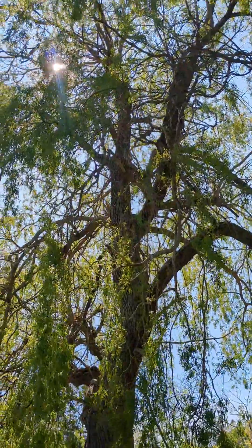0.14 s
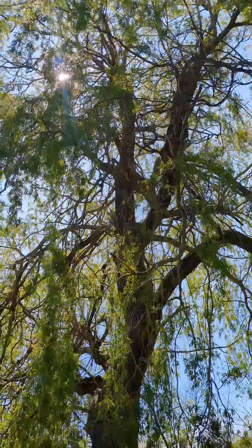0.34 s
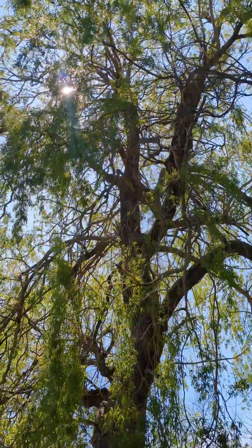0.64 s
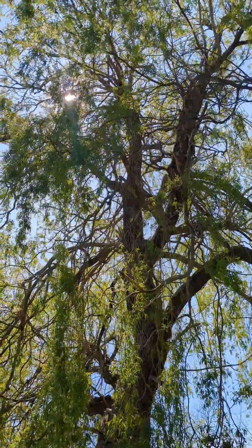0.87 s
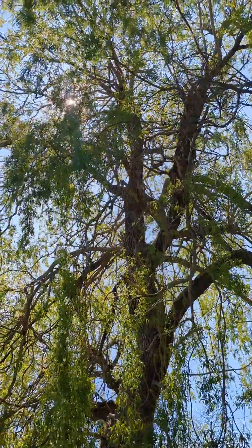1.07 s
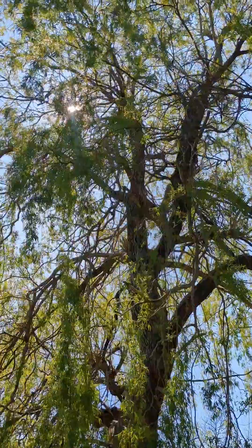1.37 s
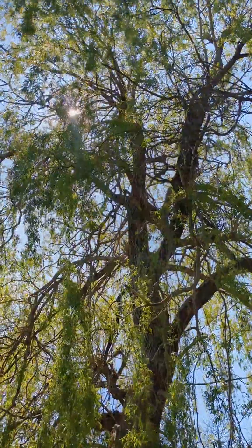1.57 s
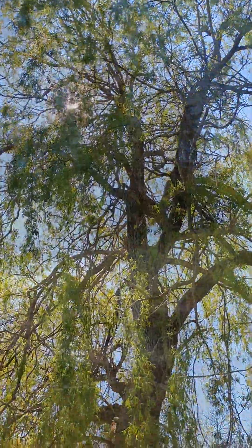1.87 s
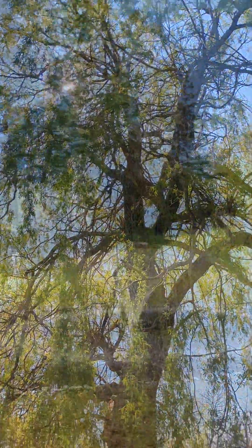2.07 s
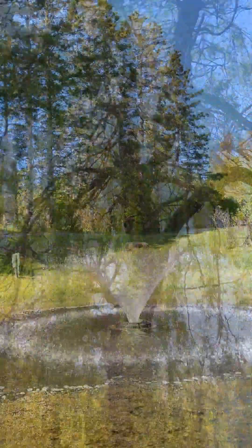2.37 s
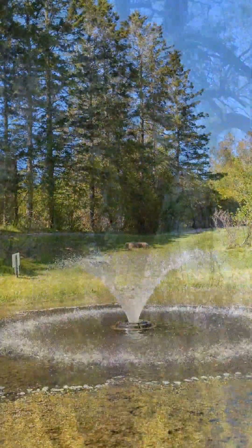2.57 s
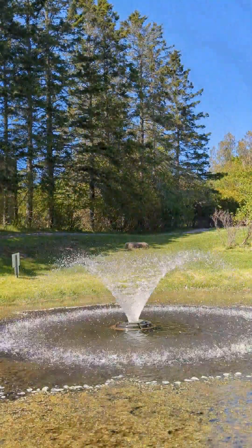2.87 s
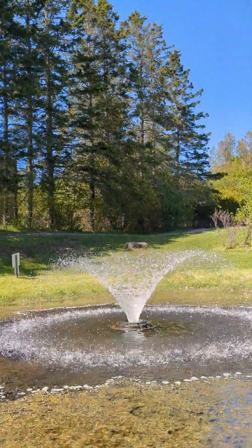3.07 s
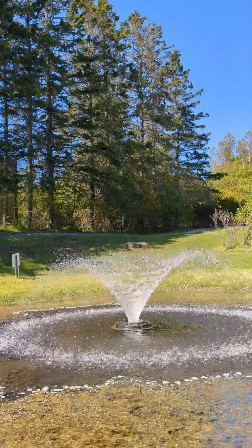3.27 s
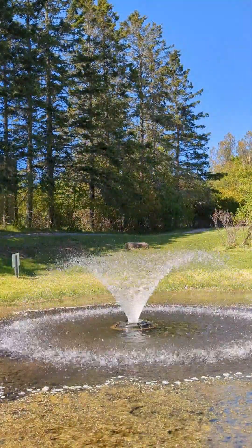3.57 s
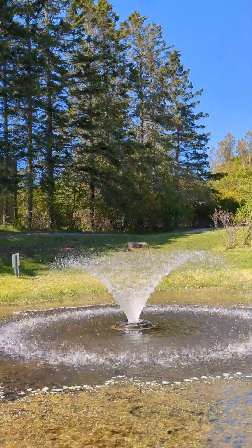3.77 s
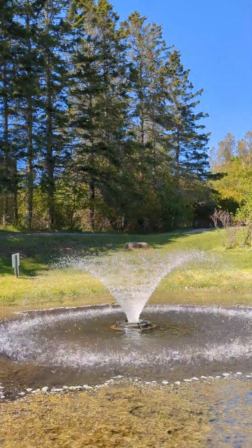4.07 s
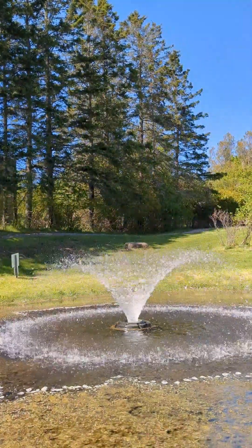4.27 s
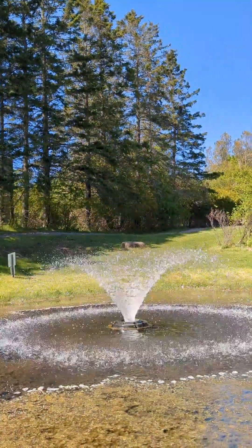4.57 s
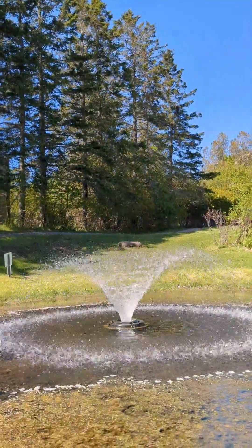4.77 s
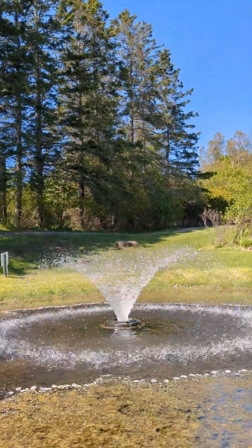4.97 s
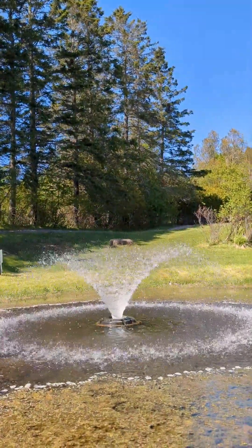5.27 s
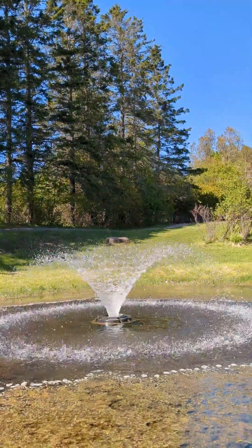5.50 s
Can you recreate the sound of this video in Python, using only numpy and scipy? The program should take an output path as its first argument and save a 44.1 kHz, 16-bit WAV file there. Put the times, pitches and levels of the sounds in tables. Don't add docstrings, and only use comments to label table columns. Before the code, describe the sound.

Soft dry-grass scuffs and faint breeze under a tree, then a quick change to a steadily splashing pond fountain, ending with a gust thump.

```python
import sys
import numpy as np
from scipy import signal
from scipy.fft import rfft, irfft, next_fast_len
from scipy.io import wavfile
from scipy.ndimage import uniform_filter1d

SR = 44100
rng = np.random.default_rng(int(sys.argv[2]) if len(sys.argv) > 2 else 0)


def to_wav(sig):
    pcm = np.clip(np.atleast_2d(sig), -1, 1) * 32767
    pcm = np.round(pcm).astype(np.int16)
    wavfile.write(sys.argv[1], SR, pcm.T)


def boost_factor(decibels):
    exponent = np.asarray(decibels, float) / 20
    return 10 ** exponent


N = 248724
T = np.arange(N) / SR
CUT_S = 1.524
SURGE_DB, SURGE_PER_S = 0.76, 9.0
HOP = 16


def evened(x):
    return x / np.sqrt(np.mean(x ** 2) + 1e-20)


def read(points, hz):
    f, value = np.transpose(points)
    return np.interp(np.log(hz + 1), np.log(f + 1), value)


def curves(rows):
    s, *columns = np.transpose(rows)
    return [np.interp(T, s, c) for c in columns]


def colour(x, gain):
    size = next_fast_len(N + 4096)
    hz = np.fft.rfftfreq(size, 1 / SR)
    return irfft(rfft(x, size) * gain(hz), size)[..., :N]


def below(corner_hz, order):
    return lambda hz: 1 / (1 + (hz / corner_hz) ** order)


def above(corner_hz, order):
    return lambda hz: 1 / (1 + (corner_hz / (hz + 1)) ** order)


def panned(x, pan_db):
    return np.array([x * boost_factor(pan_db / 2), x * boost_factor(-pan_db / 2)])


def wander(per_s):
    t = T[::64]
    paces = per_s * np.geomspace(0.1, 1, num=12)
    drift = sum(np.sin(2 * np.pi * (f * t + rng.random())) for f in paces)
    return np.interp(T, t, evened(drift))


def strokes(rows, attack, release_db):
    (s, hold, db, extra), t = np.transpose(rows)[:, :, None], T[::HOP]
    fall_db = release_db * np.maximum(t - s - attack - hold, 0)
    return np.clip((t - s) / attack, 0, 1) * boost_factor(db - fall_db), extra


def together(parts, rest):
    level = np.sqrt((parts ** 2).sum(-2) + rest ** 2)
    return uniform_filter1d(np.repeat(level, HOP, axis=-1), size=HOP, axis=-1)[..., :N]


def hiss(same, patchy_db, flicker_db):
    frames, hz = N // 64 + 9, np.fft.rfftfreq(256, 1 / SR)
    a, b, c, d, patches = rng.standard_normal((frames, 129, 5)).T
    patches = uniform_filter1d(patches, size=5, axis=0)
    patches = evened(uniform_filter1d(patches, size=30, axis=1))
    flicker = evened(uniform_filter1d(rng.standard_normal(frames), size=6))
    like = np.clip(read(same, hz), 0, 1)[:, None]
    right = a + 1j * b
    left = like * right + np.sqrt(1 - like ** 2) * (c + 1j * d)
    z = np.array([left, right]) * boost_factor(patchy_db * patches + flicker_db * flicker)
    return evened(signal.istft(z, nperseg=256, noverlap=192)[1][:, :N])


def bubble(hz, cycles, glide, lag=0.):
    t = np.arange(int(SR * (3 * cycles / hz + .001))) / SR
    u = np.maximum(t - lag, 0) * hz / cycles
    envelope = 1.43 * (1 - np.exp(-6.5 * u)) * np.exp(-2.8 * u)
    return envelope * np.sin(2 * np.pi * cycles * (u + glide * u ** 2 / 2))


def patter(per_s, spread_db, lo_hz, hi_hz, cycles, level, count=36):
    size_db = spread_db * np.minimum(rng.exponential(1, N), 3.8)
    size = boost_factor(size_db) * (rng.random(N) < per_s / SR)
    kind, chance = rng.integers(0, count, N), rng.random((count, 3))
    out = np.zeros((2, N))
    for k, hz in enumerate(np.geomspace(lo_hz, hi_hz, count)):
        ring, glide, bearing = cycles * (.5 + chance[k, 0]), 0.46 * chance[k, 1], 5e-5 * chance[k, 2]
        pair = np.array([bubble(hz, ring, glide, bearing), bubble(hz, ring, glide, 2.5e-5)])
        pair *= boost_factor(read(level, hz)) * np.sqrt(hz) / np.linalg.norm(pair[1])
        out += signal.oaconvolve(size[None] * (kind == k), pair, axes=1)[:, :N]
    return evened(out)


def knocks(rows, turns, glide, trim_db, lag, longer=0):
    out = np.zeros((2, N + SR))
    for s, peak_db, hz, pan_db in rows:
        cycles = turns * max(hz / 2500, 1) ** longer
        left = boost_factor(pan_db / 2) * bubble(hz, cycles, glide, lag)
        right = boost_factor(-pan_db / 2) * bubble(hz, cycles, glide)
        at = round(s * SR)
        out[:, at:at + len(left)] += boost_factor(peak_db + trim_db) * np.array([left, right])
    return out[:, :N]


def fountain():
    return spray_bed() + near_drops()


def slaps(per_s, spread_db, decay_s, db):
    size_db = db + spread_db * np.minimum(rng.exponential(1, N), 4)
    size = boost_factor(size_db) * (rng.random(N) < per_s / SR)
    return 1 + signal.lfilter([1], [1, -np.exp(-1 / (decay_s * SR))], size)


def falling_water():
    # Hz, left-right likeness 0 to 1.
    likeness = [(300, 0.95), (1400, 0.71), (2000, 0.92), (4300, 0.44), (6500, 0.45), (8000, 0), (9300, 0),
                (10500, 0), (12000, 0.75), (13700, 0.13)]
    # Hz, level of the drops in dB.
    drop_sizes = [(400, -10), (900, 3.5), (1800, -2.5), (3500, -8.5), (7000, -3), (12000, -10)]
    water = hiss(likeness, patchy_db=1.01, flicker_db=0.63)
    water = evened(water * slaps(per_s=150, spread_db=3.0, decay_s=.001, db=-10))
    water = water + boost_factor(-6.5) * patter(2400, 2.73, 412, 11400, 5.05, drop_sizes, count=28)
    impacts = patter(500, 3.8, 1480, 9000, 0.96, [(1200, 1.0), (9000, -2.5)], count=8)
    ringing = patter(260, 2.5, 520, 2600, 10., [(500, -2.), (2600, 0.)], count=16)
    return water + boost_factor(-15.5) * impacts + boost_factor(-15) * ringing


def at_ports(water, lag_s):
    # Hz, gain in dB.
    left_port = [(250, -10), (420, -7.5), (580, -8), (800, -14), (1300, -6.5), (2300, -2.5), (4000, -3.5),
                 (5400, -9), (6900, -11.5), (8000, -14.5), (10000, -13), (12000, -6.5), (13900, -13),
                 (15000, -12)]
    right_port = [(250, -8), (420, -9.5), (580, -5.5), (800, -12), (1300, -5), (1900, -2), (4000, -0.5),
                  (5400, -4.5), (6900, -2), (8200, -7.5), (9400, -2), (11000, -6.5), (12600, -2.5),
                  (14000, -11)]
    # echo delay in seconds, share of the direct sound, low Hz, high Hz.
    hand_echo = [
        (.00154, -0.24, 1250, 4460),
        (.00156, 0.29, 1060, 2360),
    ]

    def late(hz, s):
        return np.exp(-2j * np.pi * hz * s)

    def echo(hz, s, share, lo_hz, hi_hz):
        return 1 + share * late(hz, s) * below(hi_hz, 6)(hz) * above(lo_hz, 6)(hz)

    left = colour(water[0], lambda hz: boost_factor(read(left_port, hz)) * late(hz, lag_s) * echo(hz, *hand_echo[0]))
    right = colour(water[1], lambda hz: boost_factor(read(right_port, hz)) * echo(hz, *hand_echo[1]))
    return np.array([left, right])


def spray_bed():
    # time in seconds, splash level in dB.
    splash_level = [(1.53, -45), (1.8, -43.5), (2.3, -42), (3.1, -40.5), (3.8, -39), (4.3, -39),
                    (4.9, -38.5), (5.3, -38.5), (5.64, -38)]
    level_db = curves(splash_level)[0]
    bright_db = -0.4 + SURGE_DB * wander(SURGE_PER_S)
    churn_db = -10.5 + 1.02 * SURGE_DB * wander(SURGE_PER_S)
    water = at_ports(falling_water(), lag_s=9.9e-5)
    churn = colour(water, below(950, 6))
    spray = colour(water, above(5000, 4))
    churned = colour(boost_factor(churn_db + 10.0) * churn, above(150, 4))
    water = water - churn + churned + (boost_factor(bright_db + 0.86) - 1) * spray
    water = boost_factor(level_db + 6.0) * evened(water)
    body = colour(water, lambda hz: below(2700, 6)(hz) * above(1150, 6)(hz))
    first_db = 3.5 * np.exp(-abs(T - CUT_S) / .3)
    clump_db = 1.3 * wander(45.)
    return water + (boost_factor(clump_db - .3 + first_db) - 1) * body


def near_drops():
    # time in seconds, peak in dB, bubble Hz, left over right in dB.
    large = [(1.535, -22.5, 2000, 8), (1.69, -22.5, 1800, -0.5), (1.952, -22.5, 1580, 0),
             (2.018, -25.5, 1700, -1), (2.326, -20.5, 1670, -1), (2.365, -24, 2060, 3),
             (2.667, -23.5, 1400, 0), (2.864, -18, 2180, 0), (3.154, -28.5, 1360, -6),
             (3.223, -23, 1950, -4), (3.365, -27.5, 1340, -2.0), (3.715, -21.5, 1500, 0),
             (3.735, -21, 1920, -2), (3.758, -28, 1950, -2.0), (4.063, -26, 2380, 1),
             (4.104, -21.5, 2500, -5), (4.253, -18.5, 2770, 0), (4.316, -28, 2310, -9),
             (4.43, -23, 1490, -1.5), (4.57, -23.5, 2040, 0), (4.65, -22, 1800, -1), (4.845, -28, 2620, 8),
             (4.948, -21, 1780, -3), (5.083, -21.5, 1930, -2.0), (5.122, -21.5, 1900, -6),
             (5.187, -21.5, 1500, -2), (5.199, -21, 1900, -4), (5.232, -18.5, 2020, -2),
             (5.404, -25, 2330, 0), (5.424, -20.5, 2010, -3)]
    middling = [(1.6125, -30, 1470, -1.0), (1.7806, -30, 2230, -1.5), (2.2523, -32, 1890, -1.5),
                (2.4618, -28, 2110, -1.0), (2.505, -28.5, 1540, -1.5), (2.6127, -25.5, 2140, -1.5),
                (2.7082, -34, 1400, -2.0), (2.7506, -29, 2080, -3), (2.7834, -32, 2000, -2.0),
                (2.835, -38, 2150, -1.0), (2.9013, -33, 1400, -1.5), (2.9876, -37, 1360, -2.5),
                (3.4405, -28, 1930, -2.0), (3.509, -32.5, 1090, -2.5), (3.6731, -34, 2290, -1.5),
                (3.7755, -28, 1830, -5), (3.864, -31, 1470, -1.5), (4.6684, -28, 1840, -2.0),
                (4.6882, -28, 1840, -1.0), (4.702, -24, 2070, -2.0), (4.7416, -22, 2830, -0.5),
                (4.789, -24.5, 2170, -1.0), (4.8753, -25.5, 2060, -2.0), (4.969, -23, 2240, -5),
                (4.998, -21, 2610, 2), (5.061, -29, 1300, -3), (5.163, -23, 2170, -1.0),
                (5.4605, -31, 2060, -1.5), (5.5135, -32, 1980, -1.5)]
    # time in seconds, peak in dB, Hz, left over right in dB.
    ticks = [(1.5344, -29, 11700, -2.0), (1.6875, -25, 10400, -6.0), (1.8124, -21, 12400, -6.5),
             (2.0108, -21, 6920, -7.0), (2.2258, -19, 9000, -9.5), (2.7297, -13, 10000, -13),
             (3.088, -16, 6980, -11), (3.3408, -25, 8860, -11), (3.3622, -20, 9300, -12),
             (3.5677, -22, 9800, -1), (4.372, -16.5, 7080, -4), (5.093, -18, 9500, -21),
             (5.3442, -23, 9030, -3)]
    flecks = [(1.7374, -28, 12300, -6.5), (2.8974, -23, 9170, -6.5), (3.1876, -26, 5960, -9),
              (3.2141, -25, 9830, -6.0), (3.3822, -24, 9170, -6.5), (3.742, -22, 6550, -9),
              (4.6264, -27, 11600, -5.5), (4.6574, -29, 11900, -6.0), (4.736, -21, 7000, -10),
              (4.9934, -21, 11900, -6.0), (5.1264, -28, 12000, -5.0), (5.5228, -27, 6830, -10)]
    # time in seconds, peak in dB, Hz, left over right in dB.
    glugs = [(2.179, -41, 550, -3), (2.862, -27.5, 1000, -3), (3.588, -27.5, 1010, -1),
             (3.808, -34, 620, 0), (3.862, -33.5, 596, -3), (4.083, -29, 552, -1.5),
             (4.186, -37.5, 625, -5), (5.336, -37, 696, -1.0), (5.484, -36, 620, -1)]
    lag_s = 9.9e-5
    plops = knocks(large, 4.9, 0.052, 0.61, lag_s) + knocks(middling, 5.6, .1, 2.5, lag_s)
    plops = plops + knocks(large + middling, 1.1, 0.53, -7.0, lag_s)
    plops = np.roll(plops, 44, 1) + 0.08 * np.roll(plops, 114, 1)
    faint = np.roll(knocks(flecks, 5.0, .04, 2.3, lag_s), 30, 1)
    sharp = knocks(ticks, 5.2, 0.038, 0.54, lag_s)
    slow = knocks(glugs * np.array([1, 1, .88, 1]), 14, .5, -3, lag_s)
    return plops + faint + sharp + slow


def steps():
    # start in seconds, hold in seconds, level in dB, brightness in dB.
    scuff_rows = [(-.015, 0.038, -62.5, -12), (.02, 0.012, -61, -18), (.088, .005, -61, -19),
                  (.168, .005, -69, -21), (.226, .003, -70, -13), (.26, .06, -83, 4),
                  (.462, 0.028, -60.5, -2), (.5, 0.06, -56, -4), (.56, .03, -58.5, -4.5),
                  (.61, .015, -67.5, -9), (.815, .01, -72, -14), (.94, .005, -69, -10),
                  (1.021, .008, -61, -0.5), (1.04, .02, -62.5, -16), (1.07, 0.29, -70, -12),
                  (1.33, .015, -71, -8), (1.48, .01, -66, -14)]
    # Hz, left over right in dB.
    grass = [(180, -62), (300, -33), (372, -19), (446, -23), (622, -15.5), (746, -17), (810, -18),
             (1090, -15), (1330, -4), (1550, -8), (2260, -6), (4390, -7.5), (6640, -6.5), (12700, -13),
             (15700, -23)]
    grass_pan = [(60, -9.5), (150, -3.5), (380, 0), (950, 3), (2380, 5.5), (5980, 0), (15000, 7)]
    # time in seconds, peak in dB, Hz, left over right in dB.
    snaps = [(0.0094, -45.5, 3190, 6), (0.0278, -48, 1940, 4.0), (0.0328, -47, 1260, 4),
             (0.0985, -46, 2090, 7), (0.2324, -57, 1960, 4), (0.382, -56, 1900, 6), (0.4609, -52, 2240, 10),
             (0.6234, -52, 6870, -1.5), (0.7994, -61, 3110, 0.0), (1.0287, -52, 7000, -2),
             (1.1097, -52, 2650, 1.5), (1.1647, -56, 1680, 2.5), (1.1807, -57, 1500, 2.0),
             (1.3774, -60, 8000, -2), (1.491, -52, 1810, 6)]
    stems = [(0.4743, -52, 1670, 7), (0.5214, -50, 2450, 3.5), (0.5294, -47, 2550, 3.5),
             (0.5374, -42, 2430, 5.0), (0.5454, -52, 2260, 2.0), (0.5646, -46, 2300, 3.0),
             (0.5814, -53, 2180, 2.0), (1.043, -58, 1850, 2.0), (1.0594, -56, 1730, 1.5),
             (1.2221, -51, 3890, 1.0), (1.292, -58, 1390, 2.5), (1.3474, -53, 4850, 0.0),
             (1.4521, -61, 2590, 0.5)]
    rest_db, rest_bright_db = -76, -8.5
    scuffs, bright_db = strokes(scuff_rows, attack=0.012, release_db=390)
    body = together(scuffs, boost_factor(rest_db))
    edge = together(scuffs * boost_factor(bright_db), boost_factor(rest_db + rest_bright_db))
    blades = hiss([(300, 0.63), (4000, 0.13), (9000, 0.09)], patchy_db=1.4, flicker_db=1.6)
    blades = blades + boost_factor(-10.0) * patter(2500, 5.2, 1480, 14600, 1.8, [(800, 3), (14000, 2)], count=12)
    blades = colour(blades, lambda hz: panned(boost_factor(read(grass, hz)), read(grass_pan, hz)))
    blades[1] = np.roll(blades[1], 6)
    low = colour(blades, below(5200, 8))
    rustle = boost_factor(0.5) * (body * evened(low) + edge * evened(blades - low))
    cracks = knocks(snaps, 3.2, .05, 4, 0., longer=1) + knocks(stems, 5.5, .05, 2.5, 0.)
    return rustle + np.roll(cracks, 16, 1)


def wind(rows, lull, shape, lumpy_db, same, size):
    # Hz, dB per Hz.
    buffet = [(12, -50), (20, -13), (34, 4), (92, 1), (140, -4), (201, -21), (311, -29), (344, -33),
              (400, -41), (520, -69), (880, -120)]
    lull_db, lull_pan_db = lull
    level = together(panned(*strokes(rows, *shape)), panned(boost_factor([lull_db]), lull_pan_db))
    lumps = evened(uniform_filter1d(rng.standard_normal((2, N)), size=900, axis=1))
    swing = rng.standard_normal((2, N)) * boost_factor(lumpy_db * lumps)
    swing = colour(swing, lambda hz: boost_factor(read(buffet, hz)))
    swing[0] = same * swing[1] + (1 - same) * swing[0]
    swing = swing / np.sqrt(uniform_filter1d(swing ** 2, size=size, axis=1) + 1e-20)
    return swing * level * boost_factor(4.5)


def pump():
    # Hz, dB per Hz.
    rumble = [(21, -37), (35, 4.5), (65, 4), (96, -1.5), (118, 2.5), (141, -5.5), (177, -2.5), (260, -8.5),
              (340, -7.5), (570, -120)]
    # motor order in Hz, level in dB.
    orders = [(58, -60.5), (116, -63.5), (172, -68)]
    wash = hiss([(20, 1.0), (150, 1.0), (300, 0.97)], patchy_db=1.5, flicker_db=1.6)
    wash = colour(wash, lambda hz: boost_factor(read(rumble, hz)))
    waver = evened(uniform_filter1d(rng.standard_normal((len(orders), N)), size=6000, axis=1))
    hum = 0
    for (hz, db), w in zip(orders, waver):
        hum = hum + boost_factor(db) * np.sin(2 * np.pi * np.cumsum(hz + 2.92 * w) / SR)
    level_db = -55 + 1.62 * (T - CUT_S) - wander(SURGE_PER_S)
    return boost_factor(level_db) * evened(wash) + np.sqrt(2) * hum


def park():
    # Hz, dB per Hz.
    air_colour = [(120, -33), (200, -11.5), (408, -10.5), (455, -9), (546, -14), (878, -9.5), (4220, -7),
                  (5350, -17), (6790, -9.5), (12200, -34), (15700, -25)]
    # start in seconds, length in seconds, Hz, end Hz, level in dB, waver in Hz.
    birds = [
        (0.093, 0.14, 3720, 3660, -72, 5),
        (.73, 0.32, 462, 463, -84, 9),
        (1.31, 0.12, 4950, 4700, -77, 60),
    ]
    air = hiss([(200, 0.7), (2000, 0.047)], patchy_db=2.0, flicker_db=2.4)
    air = colour(air, lambda hz: boost_factor(read(air_colour, hz)))
    out = boost_factor(-71.5) * evened(air)
    for s, length, hz, end_hz, db, waver_hz in birds:
        u = np.clip((T - s) / length, 0, 1)
        waver = evened(uniform_filter1d(rng.standard_normal((2, N)), size=500, axis=1))
        pitch = hz + (end_hz - hz) * u + waver_hz * waver[0]
        loudness = boost_factor(db + 1.3 * waver[1]) * np.sin(np.pi * u ** 0.5) ** 0.3
        out = out + loudness * np.sin(2 * np.pi * np.cumsum(pitch) / SR)
    return out


def scene():
    # start in seconds, hold in seconds, level in dB, left over right in dB.
    breeze = [(-.02, .01, -74, -13), (.035, .01, -68, -14), (.16, .01, -68, -8), (.41, .02, -68, -2),
              (.5, .01, -62, -10), (.59, .03, -59.5, -9), (.66, 0.21, -65, -14.5), (.92, .03, -66, -14),
              (.99, 0.19, -71.5, -22), (1.42, .02, -67, -5)]
    pond_breeze = [(1.55, 0.13, -66, -10), (1.72, 0.08, -57, -13), (1.9, 0.18, -66, -12),
                   (2.07, .1, -64.5, -15), (2.2, 0.13, -69, -12), (2.63, 0.071, -56, -4),
                   (2.76, 0.08, -51, -13)]
    gust = [
        (5.51, 0.034, -37, 0.2),
    ]
    # time in seconds, peak in dB, Hz, left over right in dB.
    thump = [
        (5.518, -24, 56, -1),
    ]
    # time in seconds, half width in seconds, level in dB.
    dips = [
        (1.675, 0.0035, -16.5),
        (4.681, 0.003, -5),
        (5.16, 0.0015, -16),
    ]
    puff_shape = (0.03, 440)
    pond_on = np.clip((T - CUT_S) / 0.018, 0, 1)
    dip_gain = boost_factor(sum(db * np.exp(-((T - s) / width) ** 4) for s, width, db in dips))
    willow = steps() + park() + wind(breeze, (-71.5, -5), puff_shape, 7.2, 0.22, size=2500)
    pond = fountain() + pump()
    pond = pond + wind(gust, (-68, 0.), (0.023, 650), 0.53, 0.77, size=700)
    pond = pond + wind(pond_breeze, (-80, -6), puff_shape, 3.0, 0.091, size=2500)
    pond = pond + knocks(thump, 3.4, .05, 0., 0.)
    return willow * (1 - pond_on) + pond * pond_on * dip_gain


def starved(x, under_db):
    mid_side = np.array([x[0] + x[1], x[0] - x[1]]) / 2
    hz, _, z = signal.stft(mid_side, SR, nperseg=1024)
    local = uniform_filter1d(abs(z) ** 2, size=5, axis=1)
    local = uniform_filter1d(local, size=2, axis=2)
    usual = uniform_filter1d(local.mean(0), size=31, axis=0)
    in_band = ((hz > 3200) & (hz < 5900))[:, None]
    weak = (local < usual * boost_factor(2 * under_db)) & in_band
    weak = weak | np.roll(weak, 2, axis=1)
    weak = weak | np.roll(weak, 1, axis=2)
    mid, side = signal.istft(np.where(weak, 0 * z, z), SR, nperseg=1024)[1][:, :N]
    return np.array([mid + side, mid - side])


def band_limit(x):
    return signal.sosfilt(signal.butter(12, 15870, fs=SR, output="sos"), x)


def record(dry):
    bass_cut = signal.butter(5, 53, "high", fs=SR, output="sos")
    heard = signal.sosfilt(bass_cut, dry)
    heard = colour(heard, below(15900, 200))
    heard = starved(heard, under_db=-6.8)
    return band_limit(heard)


dry = scene()
out = record(dry)
to_wav(out)
```